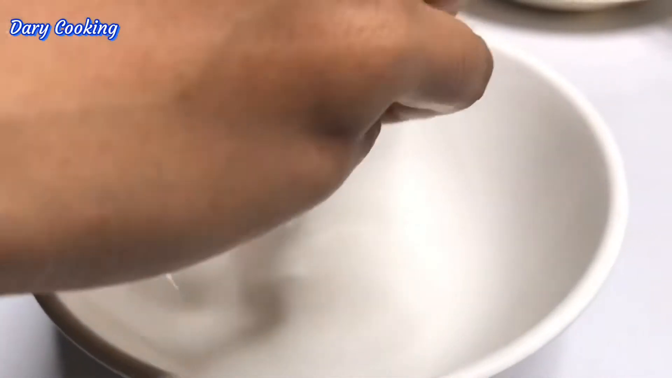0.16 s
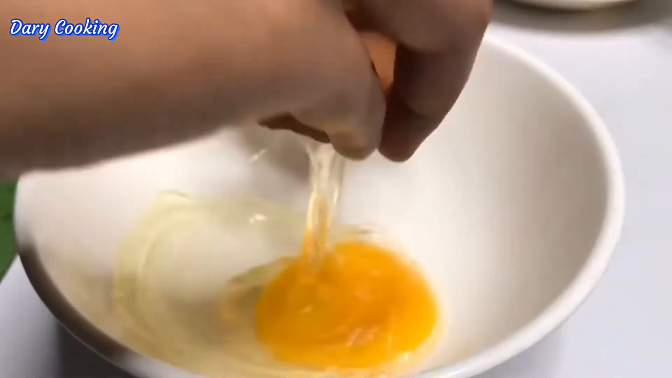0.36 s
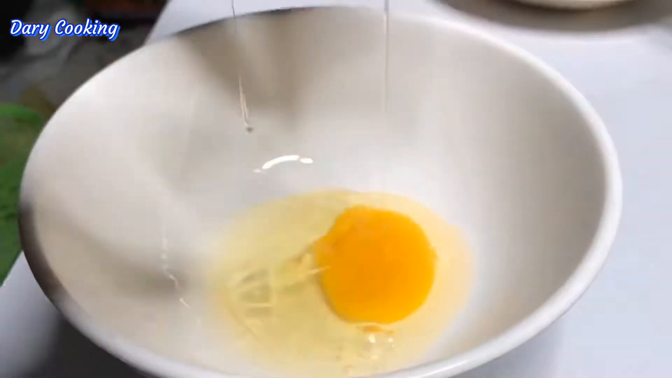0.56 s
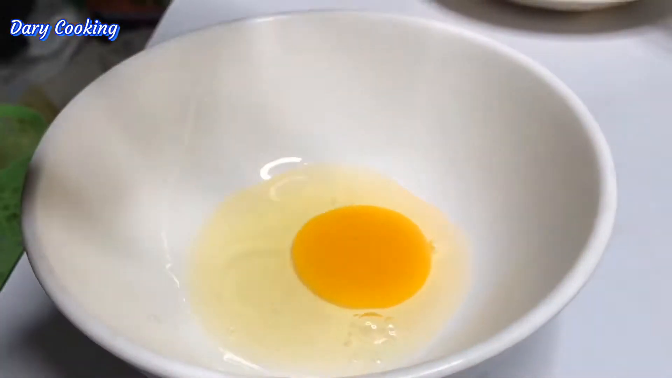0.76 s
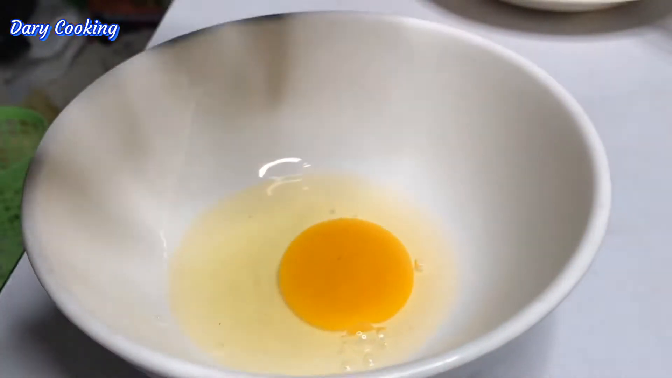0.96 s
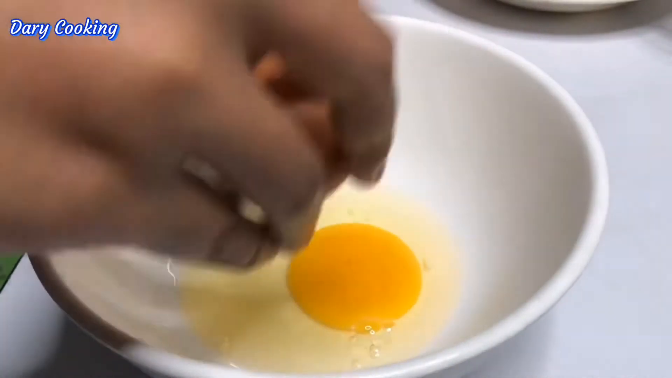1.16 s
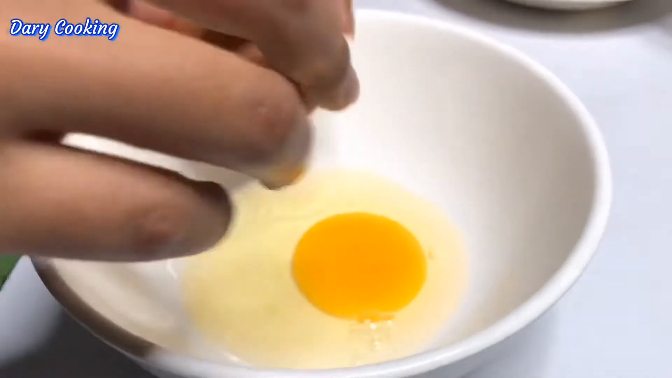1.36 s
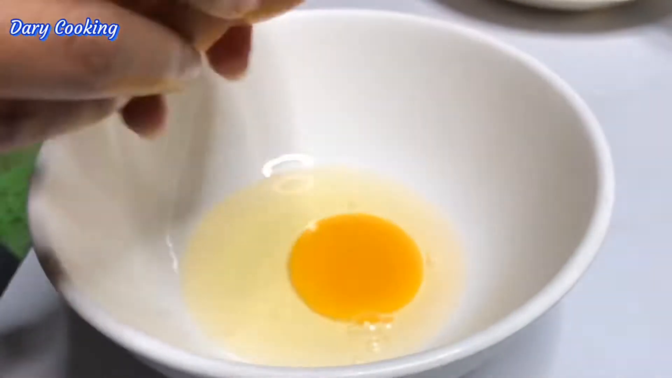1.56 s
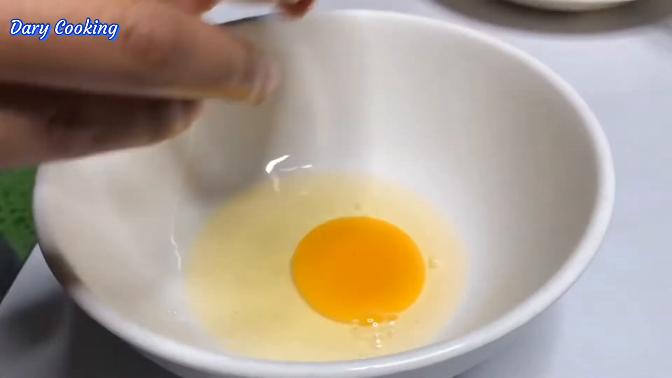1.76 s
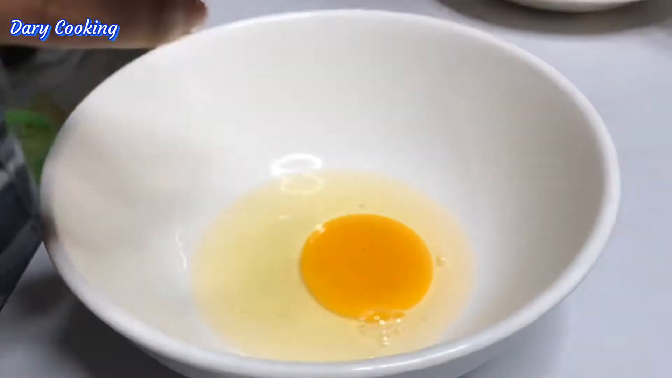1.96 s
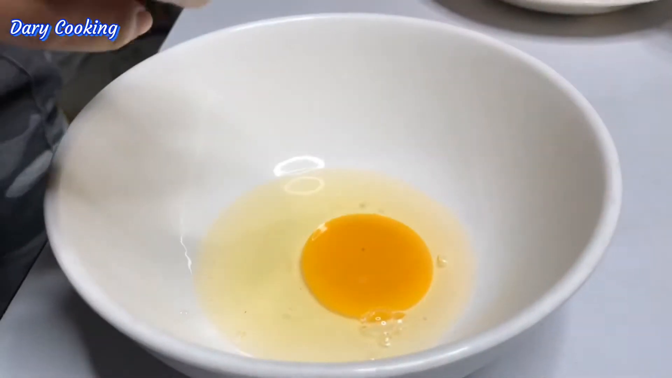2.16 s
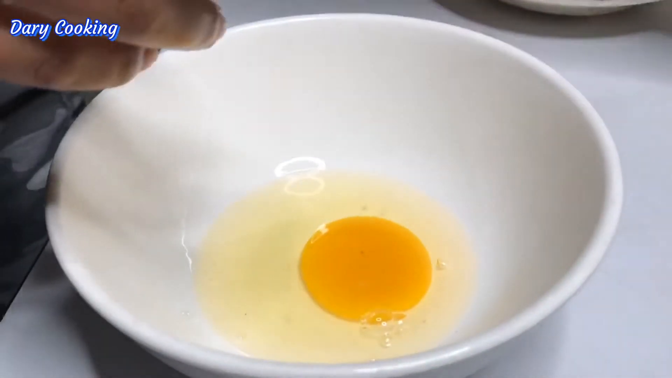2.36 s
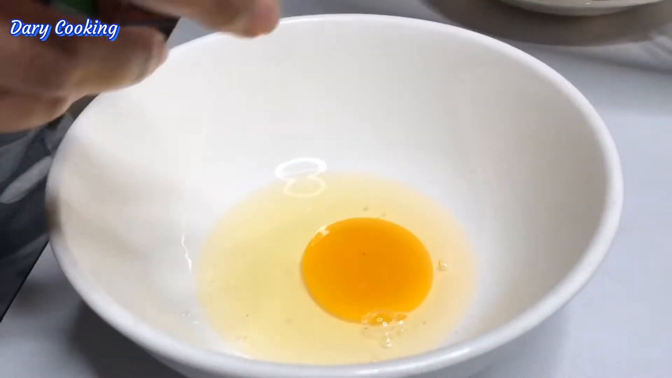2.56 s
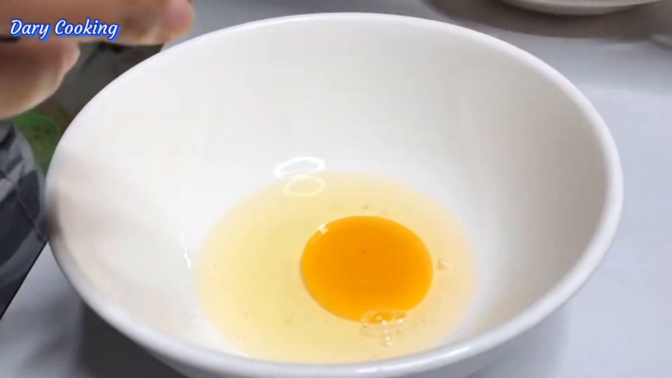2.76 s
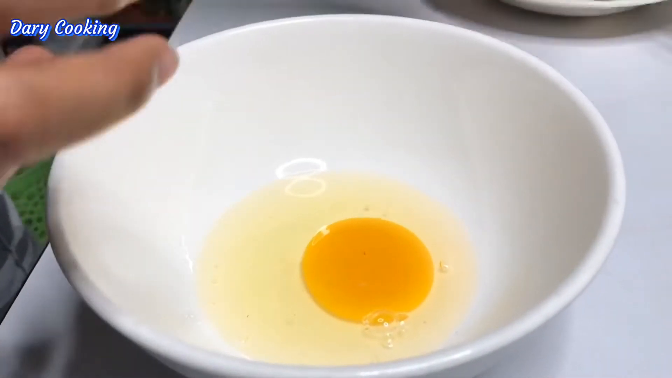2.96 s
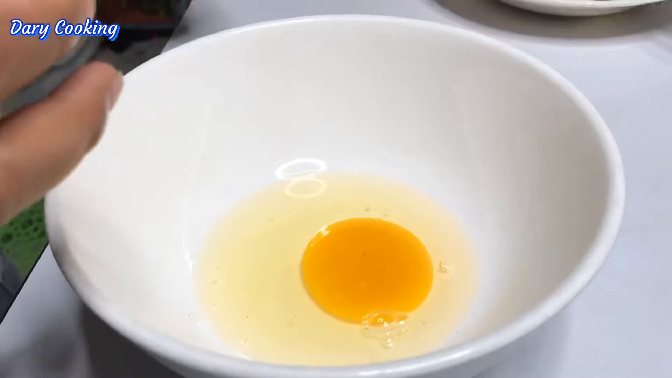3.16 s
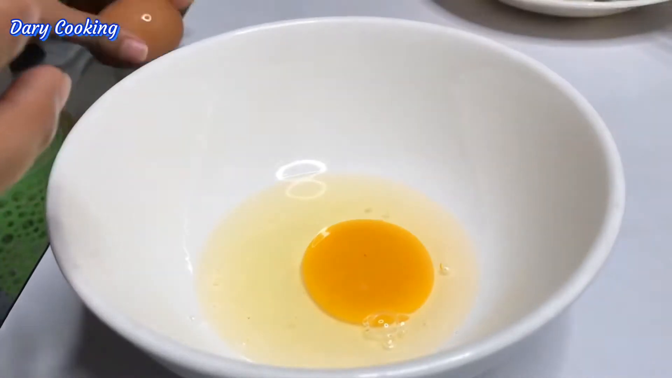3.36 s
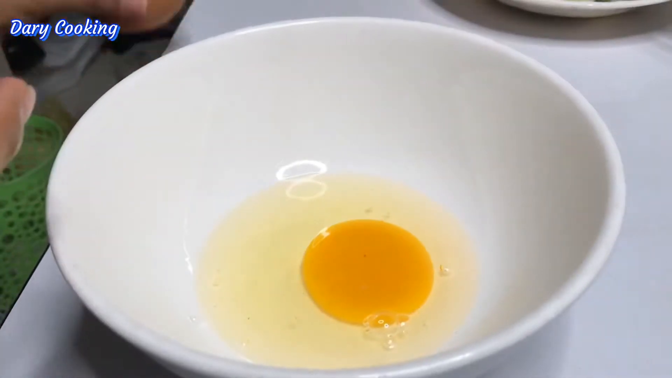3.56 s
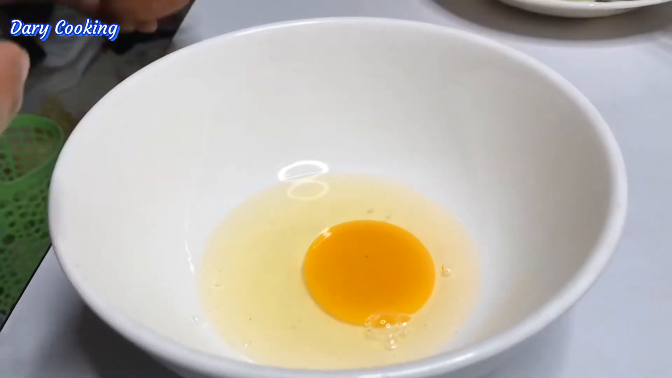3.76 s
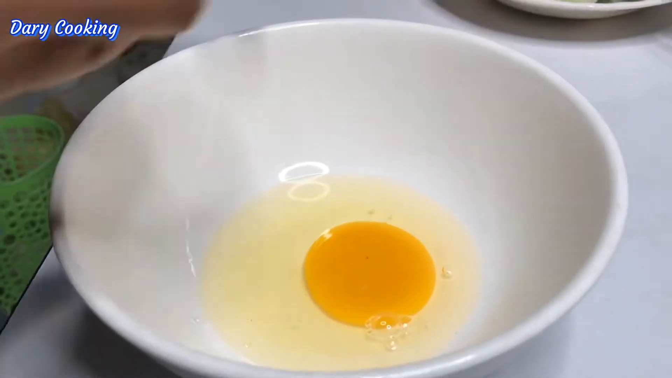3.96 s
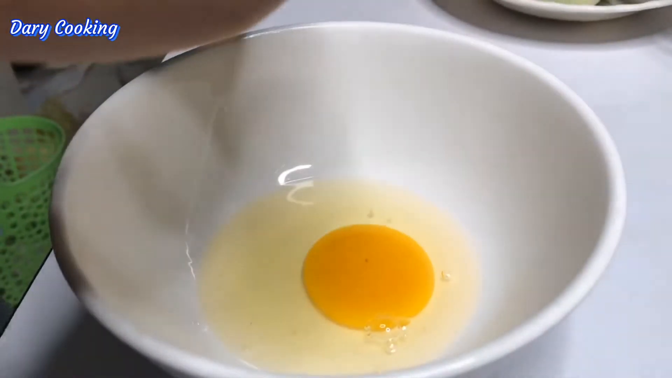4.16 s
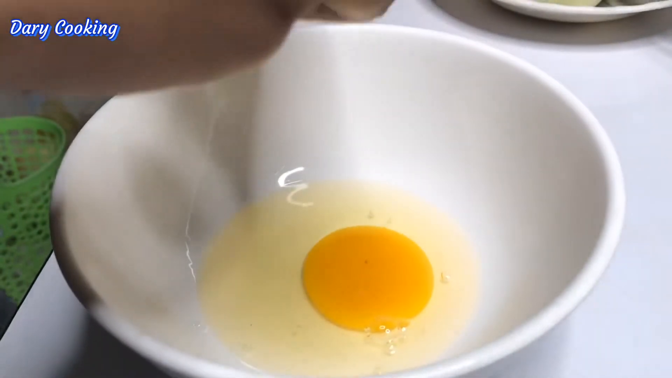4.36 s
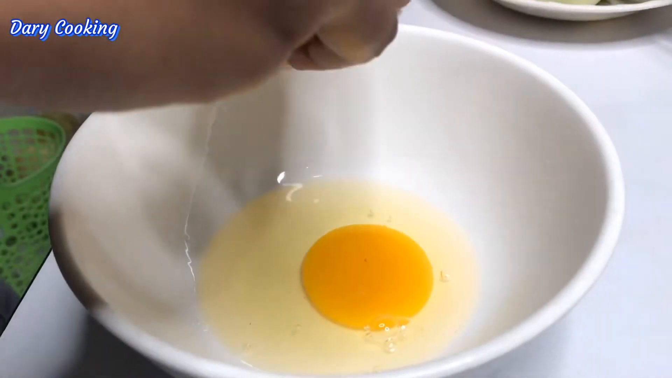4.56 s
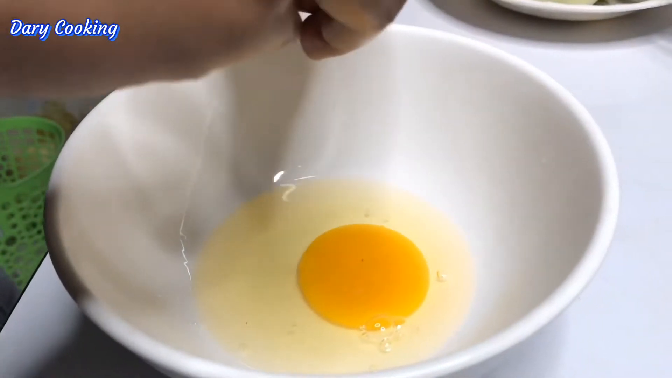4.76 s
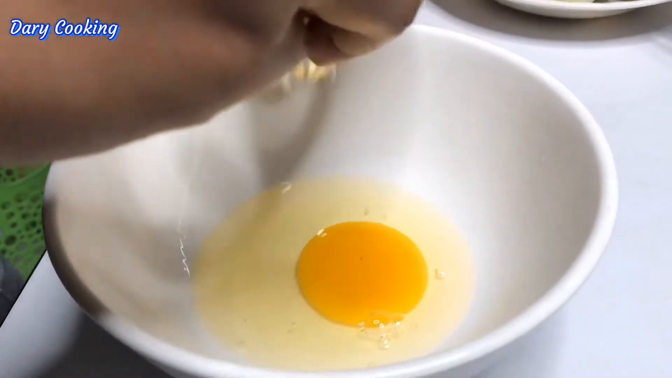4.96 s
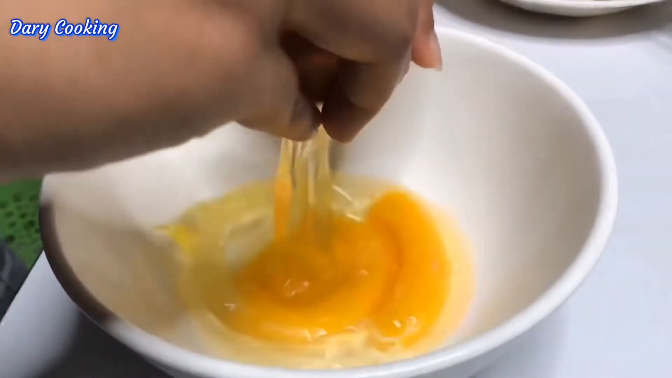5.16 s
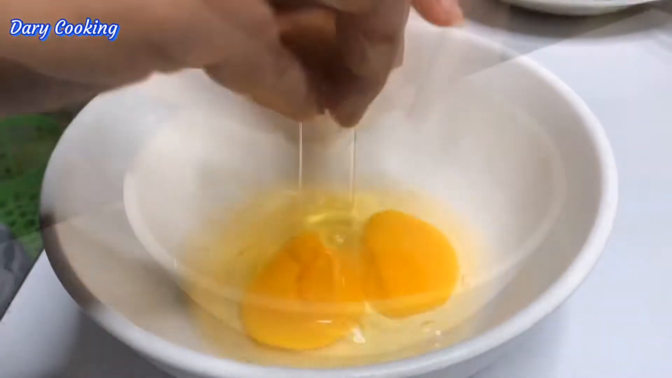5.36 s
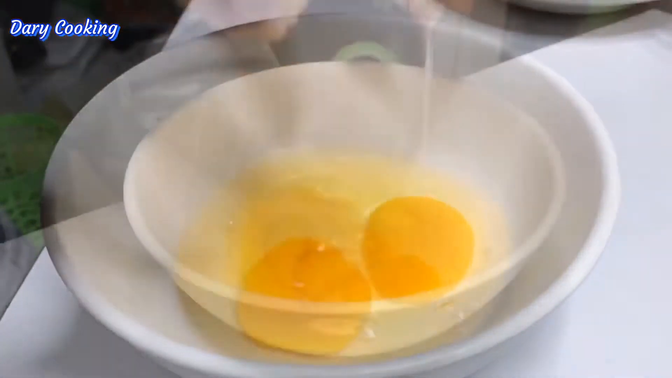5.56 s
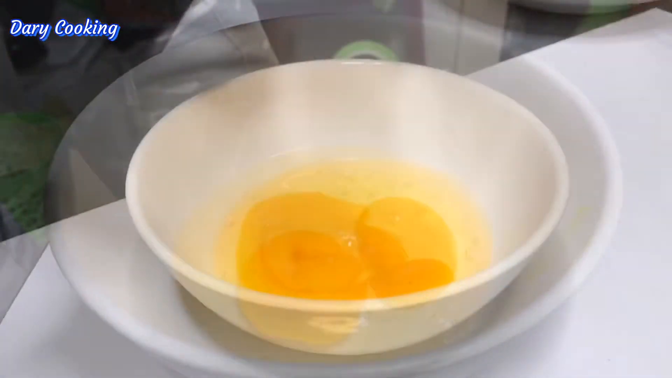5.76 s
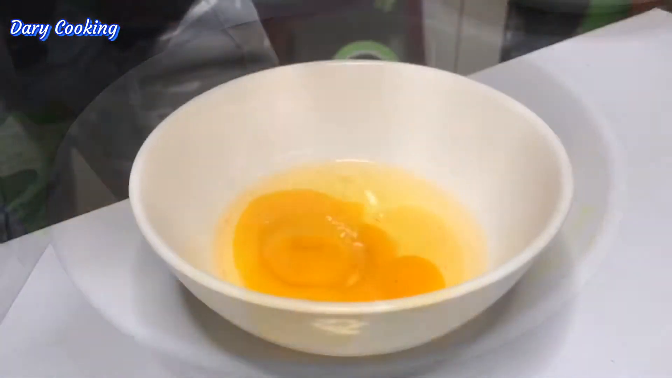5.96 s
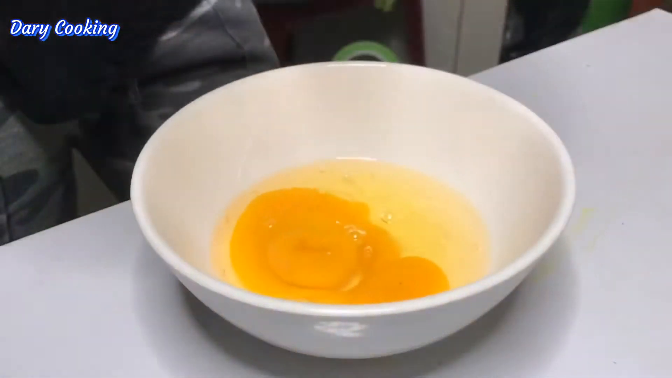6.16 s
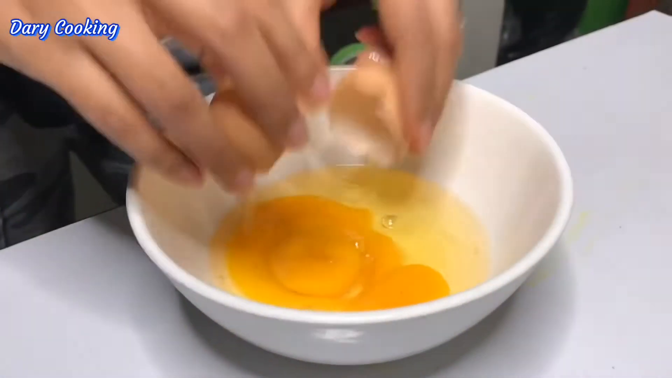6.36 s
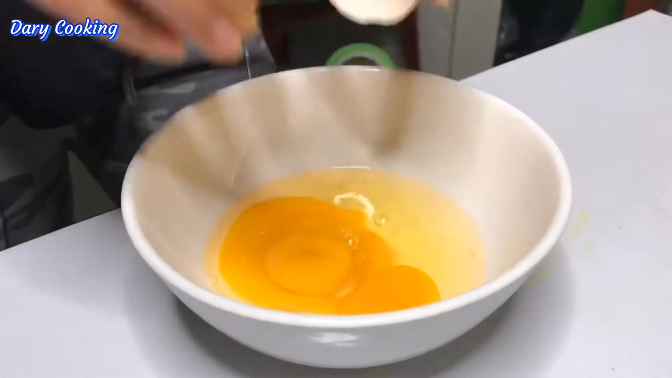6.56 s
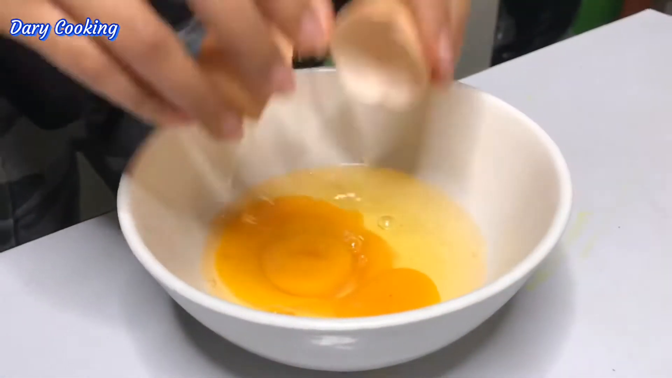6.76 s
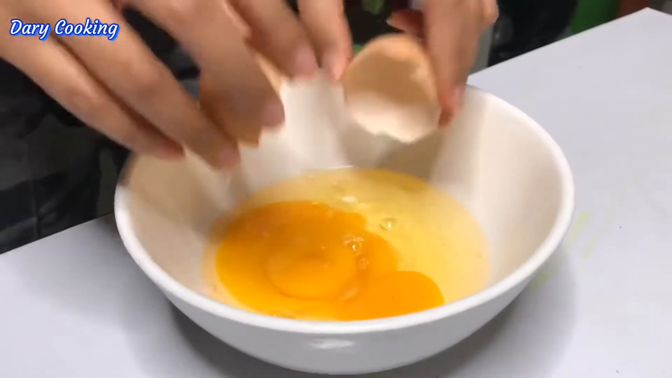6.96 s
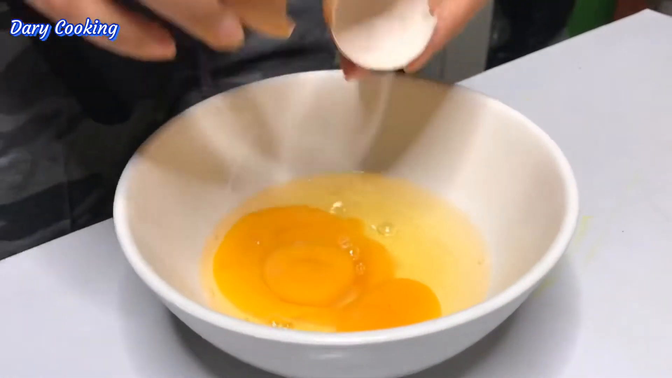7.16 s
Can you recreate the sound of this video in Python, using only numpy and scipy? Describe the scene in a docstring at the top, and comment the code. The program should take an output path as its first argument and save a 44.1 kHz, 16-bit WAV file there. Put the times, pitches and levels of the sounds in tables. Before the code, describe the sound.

The microphone is close to a ceramic bowl in a kitchen with low rumble and appliance hum. At about 0.2 seconds raw egg slips in with a small wet pop and tiny ticks, followed by faint distant scrapes. Eggshell crackles lightly at 1.4 and 1.6 seconds, and a piece is set down with a crisp tap at 2. The loudest sounds come at 3.2 and 3.5 seconds: an egg knocked twice on the bowl, first a solid thud, then a brighter crack, briefly ringing bowl and table. After a few faint ticks, the shell is prised open in sharp snaps and crackle around 4.8 seconds. The contents slide in with small wet pops between 5.1 and 5.3. From 5.5 seconds a hiss and deep rumble grow, with soft microphone bumps around 6.1 and 6.7, a faint whine, and light shell crunching until about 7.2.

```python
"""A kitchen table, the microphone close to a ceramic bowl into which eggs are broken.
A piece of shell is set down; an egg is knocked twice, ringing bowl and table. Its shell is prised open
in snaps and crackle, and the contents slip in with the wet pops of air pockets.
Behind it all lie distant scrapes, room rumble and appliance hum; near the end the room noise grows,
with a faint whine and soft bumps on the microphone."""
import sys
import numpy as np
from scipy import signal
from scipy.fft import rfft, irfft, next_fast_len
from scipy.io import wavfile
from scipy.ndimage import uniform_filter1d, map_coordinates

SR = 44100
rng = np.random.default_rng(int(sys.argv[2]) if len(sys.argv) > 2 else 0)


def pcm_store(signal):
    """Save signal as 16-bit PCM."""
    levels = np.round(np.clip(np.atleast_2d(signal), -1, 1) * 32767)
    wavfile.write(sys.argv[1], SR, levels.astype(np.int16).T)


N = 317719

# egg knocked on the bowl, or a piece of shell set down:
# (time [s], level [dB], contact brightness [Hz], crack [dB])
KNOCKS_AND_TAPS = [(2.053, -36, 1700, -34), (3.2394, -13.5, 830, -22), (3.244, -1.5, 333, -21),
                   (3.497, -5, 1630, -1), (3.502, -20, 450, -41)]
# the bowl standing on the table: (frequency [Hz], level [dB], t60 [s])
BOWL_MODES = [(62.3, -21, 0.18), (145.6, -24, 0.48), (259, 1.5, 0.026), (256.6, -18, 0.17),
              (337.5, -5.5, 0.044), (422, -7.5, 0.039), (598, -9.5, .06), (713, 3.5, 0.02),
              (745, -14, 0.028), (1134, -3, 0.031), (1235, -9, 0.027), (1490, -10, 0.033),
              (2100, -11, 0.013), (2460, -27, 0.048)]
# shell splitting under a knock: (frequency [Hz], level [dB])
SPLIT_COLOUR = [(200, -4), (760, 17), (1000, 2), (1400, 8), (2500, 1), (4000, -5), (9700, -7.5)]
# shell snaps and sticky ticks: (time [s], level [dB], cavity [Hz], treble [dB], run [s]; 0 = lone tick)
SHELL_SNAPS = [(0.068, -26, 1570, -14, 0), (.167, -26, 7660, -11, 0), (.29, -29, 3410, -3, 0),
               (1.4054, -18, 3050, -2, 0.076), (1.628, -23, 2160, 6, 0), (2.051, -17.5, 2300, -2.5, 0.017),
               (3.9782, -34, 3263, 9, 0.00066), (4.2283, -29, 1640, -0.5, 0.01),
               (4.269, -39, 2137, 10, 0.029), (4.7477, -36.5, 4200, 6.5, 0.0077),
               (4.775, -11.5, 3220, -9, 0.0012), (4.79, -6, 2458, -2.5, 0.024),
               (4.8274, -12.5, 3240, -3, 0.01), (4.87, -31, 6050, 9, 0), (4.8835, -20.5, 1640, 2.5, 0.014),
               (4.902, -19.5, 2570, -12, 0.0063), (4.9543, -23.5, 3240, -1, 0.0062),
               (5.3751, -27.5, 2622, 2, 0)]
# shell squeezed or rubbed: (time [s], length [s], level [dB], cavity [Hz], splinters [dB])
SHELL_SQUEEZES = [(2.033, 0.058, -42.5, 1940, 10), (2.342, 0.068, -54, 4000, -16),
                  (4.812, 0.026, -25.5, 1540, 9), (4.905, 0.022, -31, 2250, -13),
                  (4.966, 0.014, -40, 2050, -4), (5.299, 0.17, -42, 2900, 2.5),
                  (6.354, 0.027, -35.5, 2280, -10), (6.515, .06, -39, 1410, -27),
                  (6.672, 0.049, -40.5, 2000, -14), (6.998, 0.25, -48, 3820, 1)]
# small fractures and clicks: (frequency [Hz], level [dB])
CLICK_COLOUR = [(300, -10), (1200, -11), (2500, 0.5), (4300, -2), (6500, 4), (9700, 0)]
# air in the egg white: (time [s], level [dB], pitch [Hz], glide [octaves/s], t60 [s], film click [dB])
AIR_POCKETS = [(.2165, -17.5, 1940, -19, 0.016, -21.5), (0.239, -35, 2720, 3.5, 0.025, -55),
               (0.316, -35, 930, 0, 0.067, -47), (.333, -37, 830, 2.5, 0.1, -32),
               (5.1023, -32.5, 1740, 5, .1, -21.5), (5.1746, -16, 1664, 9.5, 0.051, -29),
               (5.2026, -30.5, 2220, 2, 0.017, -22.5), (5.255, -44, 1100, 13, .071, -33.5)]
# hand or falling egg against the bowl: (time [s], length [s], level [dB], pitch [Hz])
BOWL_NUDGES = [(1.153, 0.13, -40.5, 235), (1.219, 0.44, -46, 218), (5.075, 0.41, -41.5, 217)]
# distant scrapes, and the room's echo of a shell being set down:
# (time [s], length [s], relative level [dB], brightness [Hz])
SCRAPES_AND_ECHO = [(0.39, 0.07, -42.5, 8900), (0.46, 0.16, -46, 9000), (0.545, 0.088, -41.5, 5800),
                    (0.944, 0.044, -44.5, 6870), (1.152, 0.029, -35, 14200), (1.263, 0.072, -41.5, 5030),
                    (2.056, 0.033, -45.5, 13900)]
# hollow furniture farther off: (frequency [Hz], width [Hz], level [dB])
FURNITURE_MODES = [(236, 18, -9), (368.7, 40, -3.5), (475, 35, -1), (743, 32, 0), (1134, 61, -2),
                   (1645, 42, -7.5), (1935, 31, -6.5), (2135, 40, -12), (3033, 9.7, 0.5), (3652, 20, -15),
                   (5690, 89, -9.5)]
# broadband part of the scrapes and echo: (frequency [Hz], level [dB])
DISTANT_COLOUR = [(100, -26), (250, -12.5), (900, -6.5), (1500, -17.5), (2800, -13.5), (4500, -17),
                  (10000, -18.5)]
# soft bumps on the microphone: (time [s], level [dB], pitch [Hz])
MIC_BUMPS = [(6.088, -17.5, 130), (6.1, -17, 165), (6.206, -23, 174), (6.679, -25, 79)]
# faint background whine: (frequency [Hz], width [Hz], relative level [dB])
WHINE_BANDS = [(1052, 110, 1.5), (1781, 50, 2.5), (2430, 22, -21), (2668, 58, 0)]
# rumble of the quiet room: (frequency [Hz], level [dB])
RUMBLE_COLOUR = [(20, -32), (45, -25), (75, -30), (107, -7), (150, -3.5), (250, -5), (450, -14), (750, -16),
                 (1500, -21), (2500, -33), (4300, -48), (7000, -68), (10000, -57)]
# appliance hum: (frequency [Hz], rms level [dB])
HUM_TONES = [(104, -53.5), (146, -57.5), (260, -63)]
# the room noise that grows, hiss over a deep rumble: (frequency [Hz], level [dB])
RISING_COLOUR = [(20, -20), (35, -10), (65, 3.5), (170, -10.5), (300, -41), (750, -31.5), (1050, -22),
                 (1450, -25.5), (2100, -21.5), (3200, -27.5), (8800, -31), (10000, -38)]
# its course at the microphone: (time [s], rms level [dB])
RISING_LEVEL = [(2.3, -50.5), (3.2, -54.5), (4.6, -54), (5.55, -48.5), (5.9, -41), (6.3, -39), (7.2, -38.5)]
# decay of the kitchen's reverberation: (frequency [Hz], t60 [s])
REVERB_T60 = [(120, 0.6), (700, 0.35), (2500, 0.46), (10000, 0.31)]
# tone of that reverberation: (frequency [Hz], level [dB])
REVERB_COLOUR = [(100, 1), (700, 3.5), (2000, 0.5), (10000, -2)]


def knocks_and_taps(crack_t60=0.0084, scatter_db=-22, scatter_t60=0.22, late_db=-45, late_t60=0.98):
    """A knocked egg or a shell set down rings bowl and table; a soft contact favours the low modes."""
    out, t = np.zeros(N), clock(.5)
    bass_cut = signal.butter(2, 70, "high", fs=SR)  # a small body radiates little bass
    # the crack comes back from the walls as a diffuse hiss
    decay = fade(t, crack_t60) + amp(scatter_db) * fade(t, scatter_t60) + amp(late_db) * fade(t, late_t60)
    for s, db, contact_hz, crack_db in KNOCKS_AND_TAPS:
        ring = sum(amp(level) / np.hypot(1, (hz / contact_hz) ** 2) * fade(t, t60) * sine(t, hz)
                   for hz, level, t60 in BOWL_MODES)
        ring = signal.lfilter(*bass_cut, ring * attack(t, 0.00053))
        add(out, s, amp(crack_db) * coloured(noise(t), SPLIT_COLOUR) * decay)
        # the shell gives first, then the weight behind it lands
        add(out, s + 0.00104, in_room(amp(db) * ring, wet_db=-13.5))
    return out


def snap(hz, treble_db, ring_db=1):
    """One fracture: a short burst of treble and a brief ring of the hollow shell."""
    t = clock(.06)
    cavity = 0.48 * sine(t, hz) + 0.45 * resonant(noise(t), hz, q=4.7)
    ring = amp(ring_db) * cavity * fade(t, t60=0.019)
    crack = amp(treble_db) * coloured(noise(t), CLICK_COLOUR) * fade(t, t60=0.0097)
    return (ring + crack) * attack(t, 0.0002)


def crumble(length, hz, splinter_db, cavity_db=-3):
    """A swarm of tiny fractures, partly ringing in the shell's hollow."""
    t = clock(.25)
    fractures = grains(t, per_s=4200)
    cavity = resonant(resonant(fractures, hz, q=2.5), hz, q=2.6)
    sound = amp(splinter_db) * coloured(fractures, CLICK_COLOUR) + amp(cavity_db) * cavity
    return sound * swell(t, length, skew=0.91)


def shell_snaps(lead_s=.0045, lead_db=-14, crumble_db=-23.5, run_loss_db=18, wet_db=-17):
    """A running crack ticks, snaps, then steps on ever more slowly and weakly while the edge crumbles."""
    out = np.zeros(N)
    delays = np.cumsum(.0063 * 1.35 ** np.arange(5))  # after-snaps, seconds behind the first snap
    for s, db, hz, treble_db, run in SHELL_SNAPS:
        add(out, s, in_room(amp(db) * snap(hz, treble_db), wet_db))
        if run > 0:
            add(out, s - lead_s, amp(db + lead_db) * snap(hz, treble_db))
            crackle, run_hz = np.zeros(SR), 0.88 * hz
            add(crackle, 0, amp(crumble_db) * crumble(run, run_hz, splinter_db=treble_db + 9.5))
            for delay in delays:
                add(crackle, delay, amp(-run_loss_db * delay / run) * snap(run_hz, treble_db))
            add(out, s, in_room(amp(db) * crackle, wet_db))
    return out


def shell_crunches():
    """Each squeeze of the shell is one swell of crumbling."""
    out = np.zeros(N)
    for s, length, db, hz, splinter_db in SHELL_SQUEEZES:
        add(out, s, in_room(amp(db) * crumble(length, hz, splinter_db), wet_db=-14))
    return out


def wet_pops(glide_s=.025):
    """A film parts with a click; the air pocket behind it rings and glides as its opening changes."""
    out, t = np.zeros(N), clock(.15)
    for s, db, hz, glide, t60, click_db in AIR_POCKETS:
        pitch = hz * 2 ** (glide * np.minimum(t, glide_s))
        phase = 2 * np.pi * np.cumsum(pitch) / SR
        ring = amp(db) * np.sin(phase) * fade(t, t60) * attack(t, 0.0011)
        click = amp(click_db) * coloured(noise(t), CLICK_COLOUR) * fade(t, t60=0.0077) * attack(t, 0.00049)
        add(out, s, in_room(ring + click, wet_db=-17))
    return out


def bowl_nudges():
    """A soft mass stirs only the bowl's low resonance."""
    out, t = np.zeros(N), clock(0.4)
    for s, length, db, hz in BOWL_NUDGES:
        body = resonant(resonant(noise(t), hz, q=3.6), hz, q=4.6)
        add(out, s, amp(db) * body * swell(t, length, skew=0.57))
    return out


def scrapes_and_echo(level_db=-4):
    """Distant scrapes on hollow furniture and the echo of a shell set down, mostly heard off the walls."""
    out, t = np.zeros(N), clock(.4)

    def furniture(f):
        modes = sum(amp(db) * resonance(f, hz, width) for hz, width, db in FURNITURE_MODES)
        return modes + amp(along(DISTANT_COLOUR, f))

    for s, length, db, bright_hz in SCRAPES_AND_ECHO:
        burst = grains(t, per_s=2500) * swell(t, length, skew=0.44)
        body = filtered(burst, lambda f: furniture(f) / np.hypot(1, f / bright_hz))
        add(out, s, amp(db) * unit(body) * np.sqrt(length / t[-1]))
    return amp(level_db) * in_room(out, wet_db=1)[:N]


def mic_bumps(cycles=5.9):
    """Dull pushes on the microphone, gone in a few cycles."""
    out, t = np.zeros(N), clock(.2)
    for s, db, hz in MIC_BUMPS:
        add(out, s, -amp(db) * sine(t, hz) * fade(t, cycles / hz))
    return out


def faint_whine(start_s=5.81, length_s=0.97, level_db=-46.5):
    """A few narrow bands of noise swell and fade in the background."""
    t = np.arange(N) / SR
    bands = sum(amp(db) * resonant(resonant(noise(t), hz, q=hz / width), hz, q=hz / width)
                for hz, width, db in WHINE_BANDS)
    return amp(level_db) * unit(bands) * swell(t - start_s, length_s, skew=0.66)


def room_tone(rumble_db=-52):
    """Rumble and a wavering appliance hum; an uneven hiss with a deep low end grows near the end."""
    t = np.arange(N) / SR
    drift_db, flutter_db = .5 * wobble(4), .6 * wobble(10)
    rumble = amp(rumble_db + drift_db) * coloured(noise(t), RUMBLE_COLOUR)
    hum = sum(amp(db) * np.sqrt(2) * np.sin(2 * np.pi * hz * t + 0.77 * wobble(7)) for hz, db in HUM_TONES)
    rising_db = np.interp(t, *np.transpose(RISING_LEVEL)) + flutter_db
    rising = amp(rising_db) * coloured(patchy(noise(t), depth_db=1.9), RISING_COLOUR)
    return rumble + hum + rising


def in_room(sound, wet_db):
    """The direct sound and, 5 ms behind it, the kitchen's reverberation, new for each spot."""
    hz, t, spectrum = signal.stft(rng.standard_normal(SR // 2), SR, nperseg=256)
    tail = signal.istft(spectrum * fade(t, along(REVERB_T60, hz)[:, None]), SR, nperseg=256)[1]
    tail = coloured(tail, REVERB_COLOUR) / np.sqrt(len(tail))
    response = np.pad(amp(wet_db) * tail, (SR // 200, 0))
    response[0] = 1  # direct path to the microphone
    return signal.fftconvolve(sound, response)


def amp(db):
    """Decibels to gain."""
    return 10 ** (np.asarray(db) / 20)


def unit(x):
    """Scale to rms 1."""
    return x / np.sqrt(np.mean(x ** 2) + 1e-20)


def along(points, hz):
    """(frequency [Hz], value) points read on a log axis."""
    f, values = np.transpose(points)
    return np.interp(np.log(hz + 1), np.log(f), values)


def filtered(x, response):
    """x through a frequency response."""
    size = next_fast_len(len(x) + 8192)
    return irfft(rfft(x, size) * response(np.fft.rfftfreq(size, 1 / SR)), size)[:len(x)]


def coloured(x, colour):
    """x shaped by (frequency [Hz], level [dB]) points, at rms 1."""
    return unit(filtered(x, lambda f: amp(along(colour, f))))


def resonance(f, hz, width):
    """Band-pass response of one mode."""
    return 1j * f * width / (hz * hz - f * f + 1j * f * width)


def resonant(x, hz, q):
    """x through one resonance, at rms 1."""
    return unit(filtered(x, lambda f: resonance(f, hz, hz / q)))


def patchy(x, depth_db):
    """x with gains that drift over a few hundred hertz and a few tens of milliseconds."""
    spectrum = signal.stft(x, nperseg=512)[2]
    field = uniform_filter1d(rng.standard_normal(spectrum.shape), size=5, axis=0)
    field = uniform_filter1d(field, size=12, axis=1)
    return signal.istft(spectrum * amp(depth_db * unit(field)), nperseg=512)[1][:len(x)]


def noise(t):
    """White noise as long as t."""
    return rng.standard_normal(len(t))


def grains(t, per_s):
    """Sparse random impulses."""
    return (rng.random(len(t)) < per_s / SR) * noise(t)


def sine(t, hz):
    """A pure tone."""
    return np.sin(2 * np.pi * hz * t)


def clock(length):
    """Sample times over a length in seconds."""
    return np.arange(int(length * SR)) / SR


def attack(t, rise_s):
    """Onset with time constant rise_s."""
    return 1 - np.exp(-t / rise_s)


def fade(t, t60):
    """Decay by 60 dB in t60 seconds."""
    return np.exp(-np.log(1000) * t / t60)


def swell(t, length, skew):
    """A stroke that rises and dies within its length; a small skew peaks early."""
    return np.abs(np.sin(np.pi * np.clip(t / length, 0, 1) ** skew)) ** 1.5


def wobble(rate):
    """A smooth random curve, rate knots a second."""
    knots = rng.standard_normal(int(N * rate / SR) + 4)
    return map_coordinates(knots, [np.arange(N) * rate / SR])


def add(track, s, sound):
    """Mix a sound into the track at time s."""
    start = round(s * SR)
    track[start:start + len(sound)] += sound[:N - start]


def scene():
    """Eggs close up and the kitchen behind them, on one microphone."""
    eggs = knocks_and_taps() + shell_snaps() + shell_crunches() + wet_pops()
    return (eggs + scrapes_and_echo() + bowl_nudges() + mic_bumps() + room_tone() + faint_whine())[None]


def record(dry):
    """The recorder clips the highest peaks and keeps nothing above its band limit."""
    top_hz = 10200
    clipped = np.clip(dry[0], -.9, .9)
    return filtered(clipped, lambda f: 1 / np.hypot(1, (f / top_hz) ** 60))[None]


dry = scene()
out = record(dry)
pcm_store(out)
```